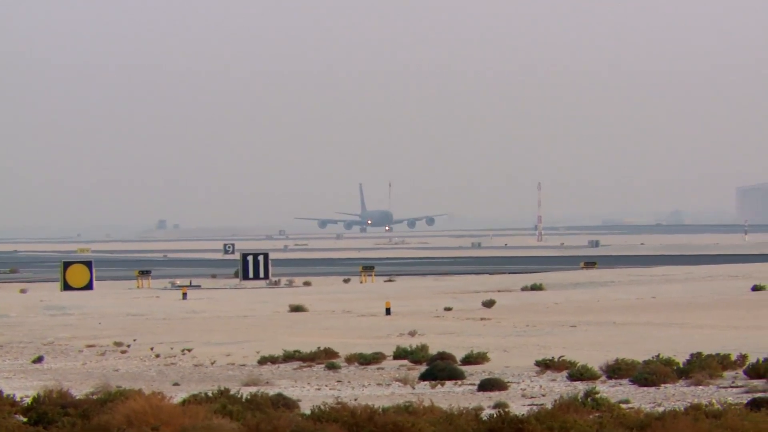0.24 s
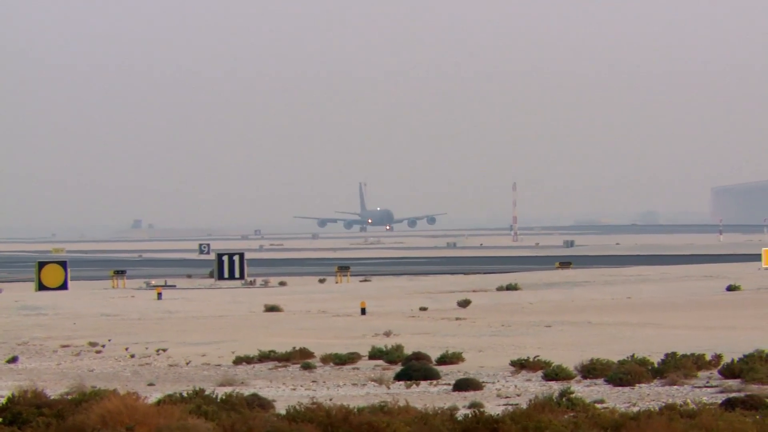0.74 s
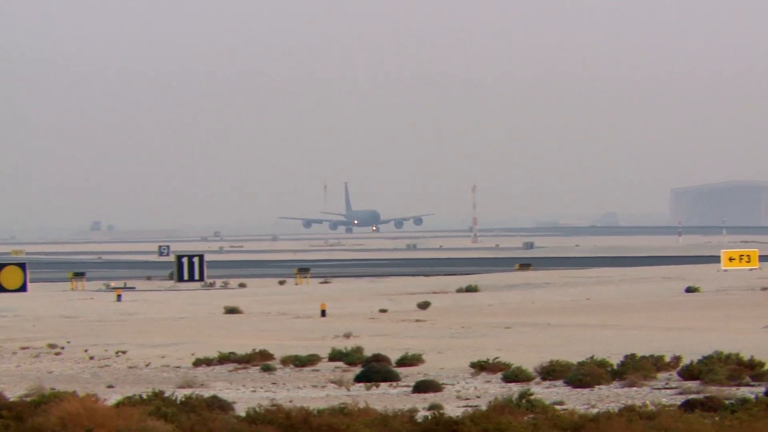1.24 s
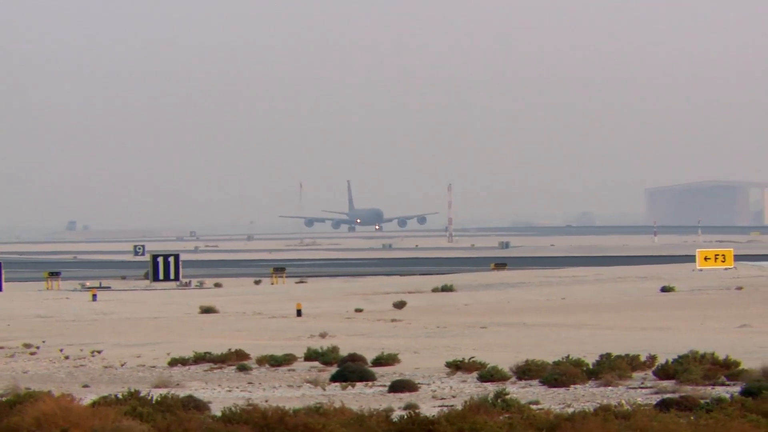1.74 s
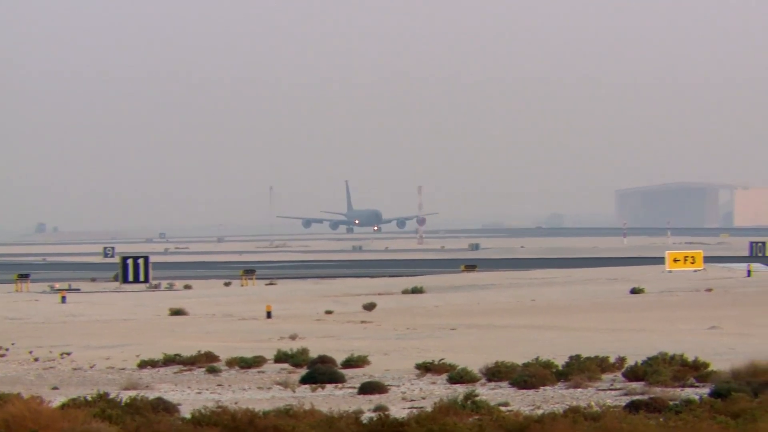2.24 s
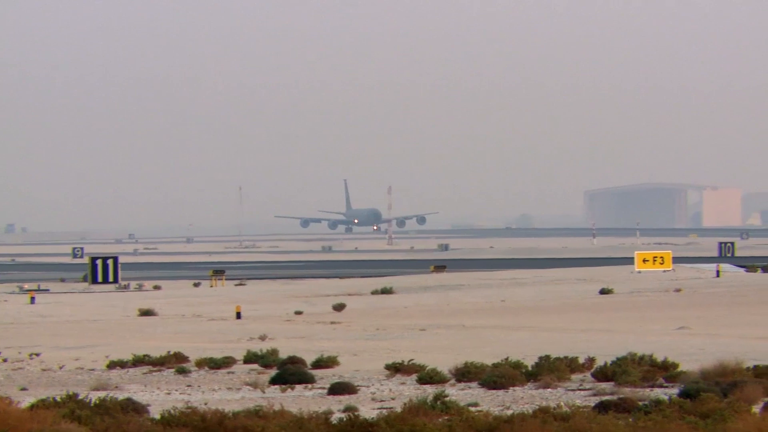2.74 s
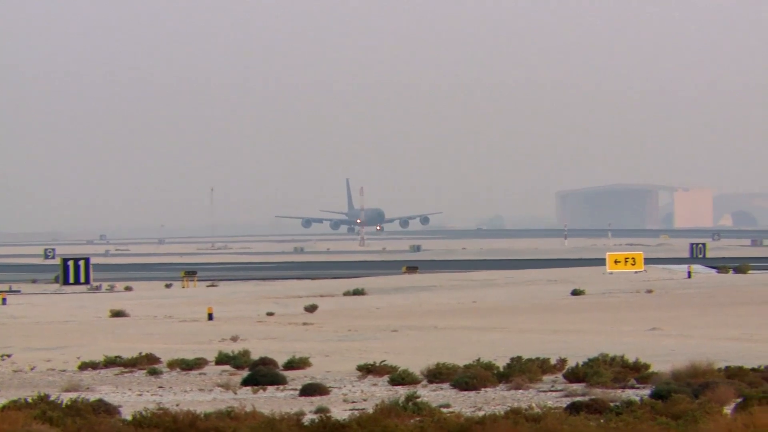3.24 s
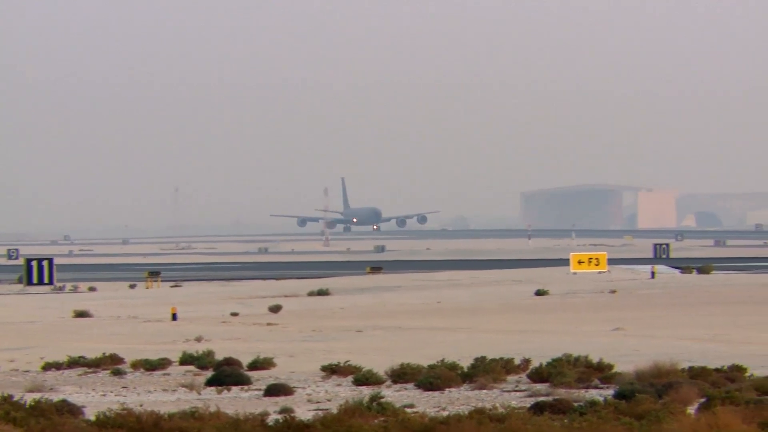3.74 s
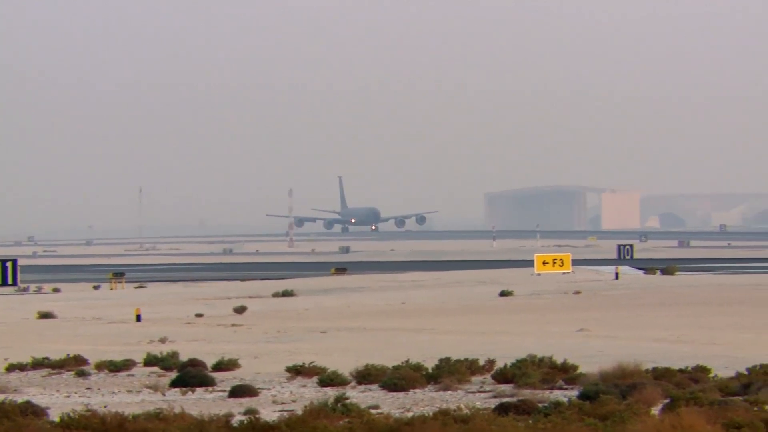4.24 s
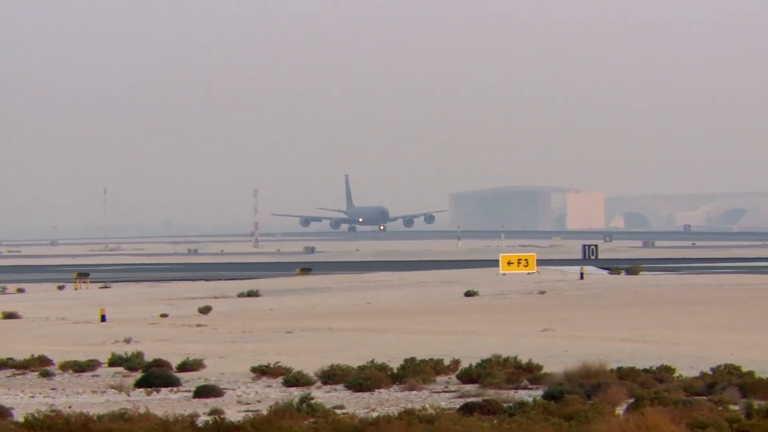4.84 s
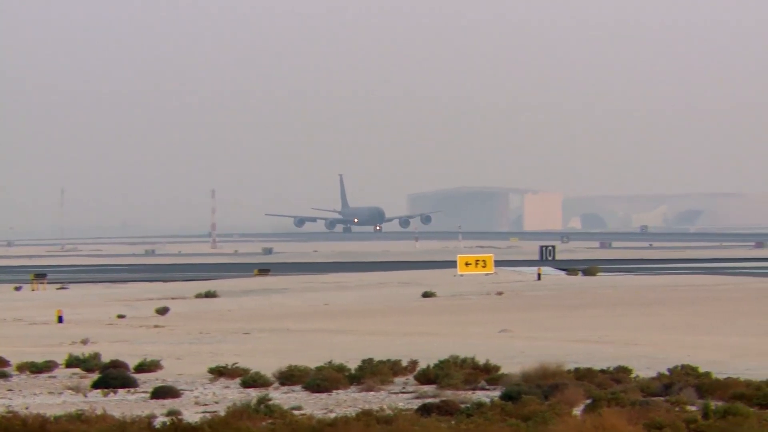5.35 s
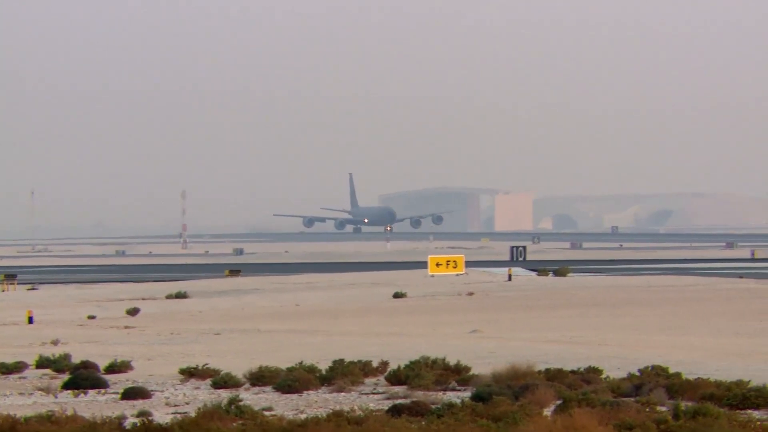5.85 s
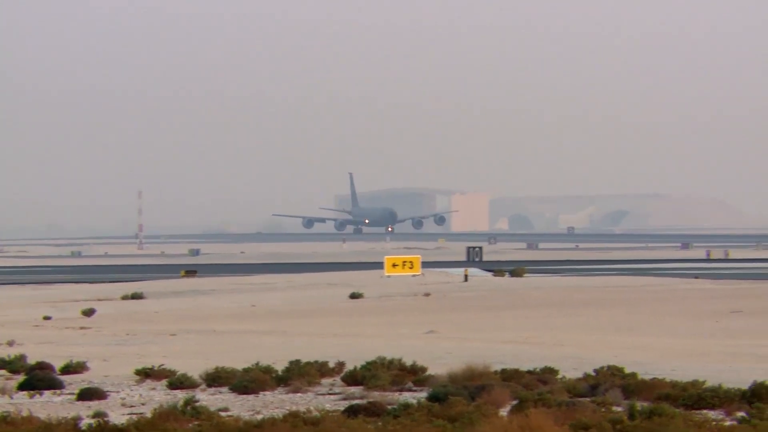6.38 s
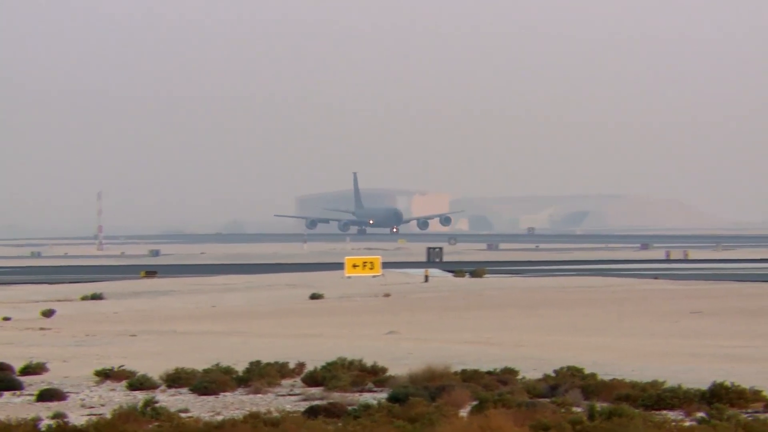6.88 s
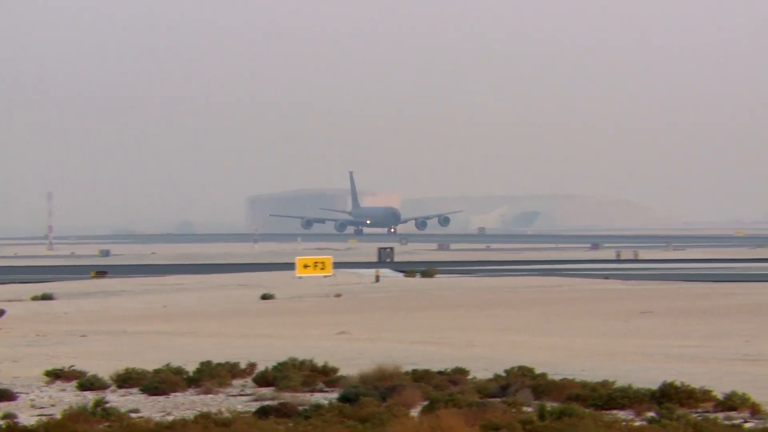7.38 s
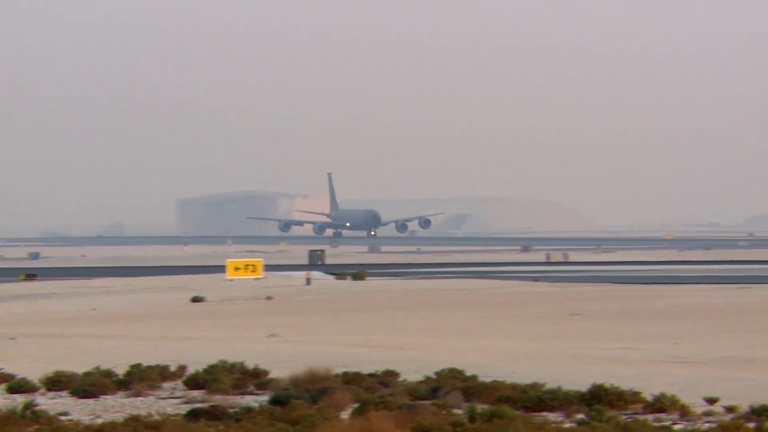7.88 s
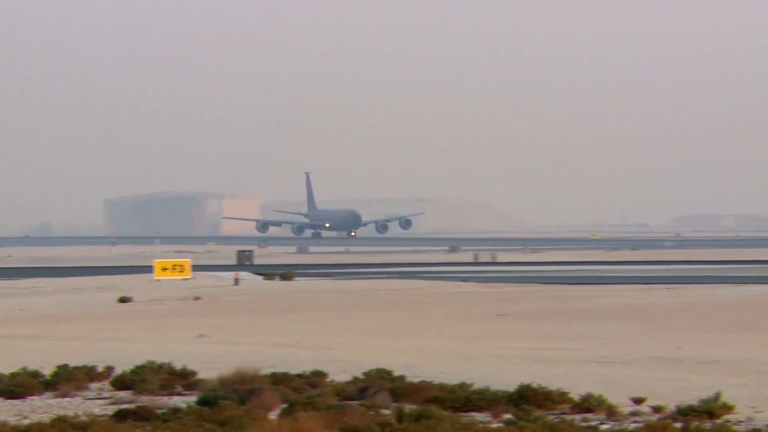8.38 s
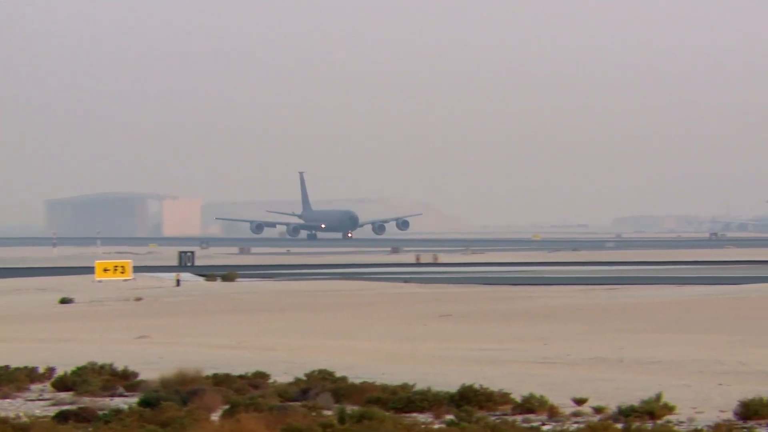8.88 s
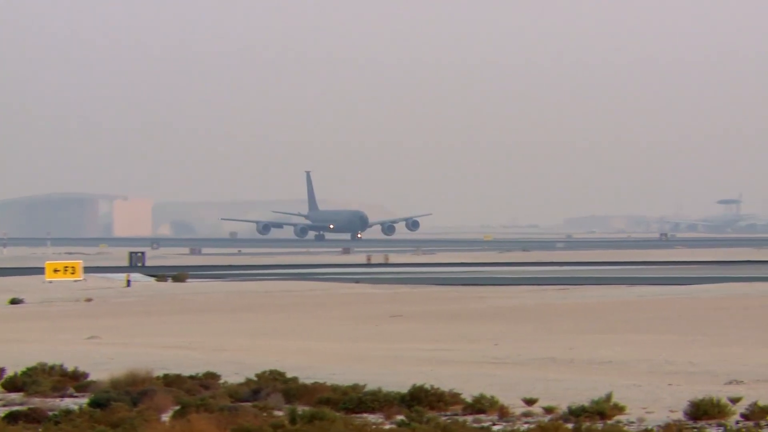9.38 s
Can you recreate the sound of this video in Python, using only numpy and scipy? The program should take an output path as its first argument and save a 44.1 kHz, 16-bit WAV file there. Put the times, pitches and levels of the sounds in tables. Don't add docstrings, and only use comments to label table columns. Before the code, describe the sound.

On a flat open airfield, a steady low drone sits under the deep rumble of a far four-engine jet. Its hiss and thin whine dip briefly, then grow over nearly ten seconds, becoming brighter and rougher. The camera's own microphone adds faint hiss, tiny early clicks, one hard plastic snap before the middle and small late ticks.

```python
import sys
import numpy as np
from scipy import signal
from scipy.fft import rfft, irfft, next_fast_len
from scipy.io import wavfile
from scipy.ndimage import uniform_filter1d, map_coordinates

SR = 44100
rng = np.random.default_rng(int(sys.argv[2]) if len(sys.argv) > 2 else 0)


def int16_out(signal):
    q = np.round(np.clip(np.atleast_2d(signal).T, -1, 1) * 32767)
    wavfile.write(sys.argv[1], SR, q.astype(np.int16))


def gain_from_db(level_db):
    decades = np.asarray(level_db, float) / 20
    return 10 ** decades


N = 424241
BLADES = 44


def unit(x):
    return x / np.sqrt(np.mean(x ** 2) + 1e-20)


def curves(rows):
    s, *cols = np.transpose(rows)
    return [np.interp(np.arange(N) / SR, s, c) for c in cols]


def swells(rows):
    t = np.arange(0, N + 64, 64) / SR
    gain_db = sum(db * np.exp(-((t - s) / half) ** 2) for s, db, half in rows)
    return curves(np.transpose([t, gain_db]))[0]


def wobble(rate):
    knots = rng.standard_normal(int(N * rate / SR) + 4)
    return map_coordinates(knots, [np.arange(N) * rate / SR])


def rush(spectrum, patchy_db):
    z = signal.stft(rng.standard_normal(N + 1024), nperseg=1024)[2]
    field = uniform_filter1d(rng.standard_normal(z.shape), size=10, axis=0)
    field = uniform_filter1d(field, size=9, axis=1)
    white = signal.istft(z * gain_from_db(patchy_db * unit(field)), nperseg=1024)[1]
    m = next_fast_len(N + 8192)
    f, db = np.transpose(spectrum)
    gain = gain_from_db(np.interp(np.log(np.fft.rfftfreq(m, 1 / SR) + 1), np.log(f + 1), db))
    return unit(irfft(rfft(white, m) * gain, m)[:N])


# pitch_hz, level_db (per Hz)
DRONE = [(120, -120), (170, -7.5), (205, 0), (240, -11.5), (400, -20.5), (650, -20), (930, -21),
         (1100, -30), (2200, -41), (3500, -63), (7000, -120)]


def airfield():
    return gain_from_db(-44.5 + 0.44 * wobble(0.87)) * rush(DRONE, patchy_db=0.1)


# start_s, level_db
APPROACH = [(0, -65), (1.6, -71), (2.5, -68.5), (3.4, -65.5), (4.6, -63), (5.8, -62.5), (6.8, -60.5),
            (7.5, -59), (8.2, -55.5), (8.9, -53.5), (9.25, -53), (9.62, -54)]


def approach():
    hiss_db = curves(APPROACH)[0]
    close_db = -53
    return hiss_db, hiss_db - close_db


# pitch_hz, level_db (per Hz)
RUMBLE = [(12, -52), (20, 5), (26, -11), (34, -16.5), (55, 0), (100, -2), (160, -7), (230, -19),
          (350, -30.5), (600, -120)]
# pitch_hz, level_db (per Hz)
ROAR = [(90, -120), (150, -5), (200, 1), (300, 2.5), (450, -4.5), (600, -11), (800, -24.5), (1200, -64),
        (2500, -120)]


def exhaust():
    nearer_db = approach()[1]
    rumble_db = -29 + 0.31 * nearer_db
    roar_db = -32.5 + 1.81 * nearer_db
    creeping_db = -47.5
    roar = np.hypot(gain_from_db(roar_db), gain_from_db(creeping_db))
    return gain_from_db(rumble_db) * rush(RUMBLE, patchy_db=0.0) + roar * rush(ROAR, patchy_db=1.4)


TRIM = [-.0024, -.0008, .0006, .002]


def shaft_angles():
    start_hz, rise_hz_per_s = 3930, 28.3
    blade_hz = start_hz + rise_hz_per_s * np.arange(N) / SR
    turns = 2 * np.pi * np.cumsum(blade_hz) / (SR * BLADES)
    return [turns * (1 + trim) + 0.016 * wobble(14) for trim in TRIM]


ENGINE_DB = [-1, -6, 3, -3]
# start_s (centre), gain_db, half_length_s
GLINTS = [(.6, -5, .6), (2.3, 5, .1), (2.75, 5, .08), (5.1, 3, .1), (5.4, -2, .15), (5.8, 1, .12),
          (6.3, 6, .15), (7.17, -6, .05), (7.288, 9, 0.043), (7.7, -8, 0.23), (8.03, 7, 0.075),
          (8.3, -7, 0.35), (9.462, -9, 0.066)]


def blade_whine(shafts, nearer_db):
    whine = np.zeros(N)
    for shaft, facing_db in zip(shafts, ENGINE_DB):
        tone = np.sin(BLADES * shaft + rng.uniform(0, 2 * np.pi))
        whine += gain_from_db(facing_db + 1.6 * wobble(11)) * tone
    whine /= np.sqrt(np.abs(uniform_filter1d(whine ** 2, size=6000)) + 1e-9)
    whine_db = -74 + 1.36 * nearer_db + swells(GLINTS)
    return gain_from_db(whine_db + 7.5) * whine


# shaft_order (multiples of shaft speed), level_db (over the fan hiss)
BUZZ = [(7, -15), (11, -23), (17, -24), (20, -18), (23, -18), (26, -25), (34, -28), (43, -43)]
# shaft_order, gain_db
PROUD = [(14, 4), (16, 6), (19, 2), (22, 4), (28, 3), (34, 6), (40, 10)]


def shaft_buzz(shafts, gust_db, near):
    orders = np.arange(BUZZ[0][0], BLADES)
    buzz_db = np.interp(orders, *np.transpose(BUZZ))
    buzz_db = buzz_db + sum(db * (orders == k) for k, db in PROUD)
    air = gain_from_db(-.3 * (1 - near))
    out = np.zeros(N)
    for shaft, facing_db in zip(shafts, ENGINE_DB):
        start = rng.uniform(0, 2 * np.pi, len(orders))
        spread_db = rng.normal(0, 3, len(orders))
        spin = (air * np.exp(1j * shaft)).astype(np.complex64)
        buzz = np.zeros(N, np.complex64)
        for k in reversed(range(len(orders))):
            buzz = buzz * spin + np.complex64(gain_from_db(buzz_db[k] + spread_db[k]) * np.exp(1j * start[k]))
        buzz = (buzz * np.exp(7j * shaft)).real
        level = gain_from_db(gust_db + facing_db - 3.5 + 3.5 * wobble(4))
        out += level * buzz / air ** 13
    return out


# pitch_hz, level_db (per Hz)
FAN = [(500, -120), (1000, -2.5), (1500, -2.5), (1800, 0), (2150, -1), (2450, -1.5), (2800, -4),
       (3500, -11.5), (4300, -20), (5500, -42), (9000, -120)]
# pitch_hz, level_db (per Hz)
FAN_FAR = [(500, -120), (1000, -2.5), (1400, 0), (1900, -2), (2400, -10), (3000, -13.5), (3600, -16.5),
           (4500, -26), (9000, -120)]


def fan_hiss(gust_db, near):
    hiss = np.sqrt(1 - near) * rush(FAN_FAR, patchy_db=1.1) + np.sqrt(near) * rush(FAN, patchy_db=0.5)
    return gain_from_db(gust_db - 0.5 + 0.71 * wobble(7.3)) * hiss


# pitch_hz, level_db (per Hz)
INLET = [(1300, -120), (1750, -5), (2000, -2), (2200, 4), (2500, -9), (3200, -120)]


def inlet_resonance(hiss_db, gain_db, near):
    return gain_from_db(hiss_db - 7 + 3 * gain_db) * near * rush(INLET, patchy_db=0.5)


# start_s (centre), gain_db, half_length_s
SURGES = [
    (5.25, 2, .15),
    (8.13, 2.5, .14),
    (8.38, -2.5, .08),
    (8.62, 2.5, .11),
    (8.95, 2, .13),
    (9.4, -2.5, .2),
]


def fans():
    hiss_db, nearer_db = approach()
    gain_db = swells(SURGES)
    gust_db = hiss_db + 0.14 * gain_db
    near = np.clip((hiss_db + 67) / 13, 0, 1)
    shafts = shaft_angles()
    tones = blade_whine(shafts, nearer_db) + shaft_buzz(shafts, gust_db, near)
    return tones + inlet_resonance(hiss_db, gain_db, near) + fan_hiss(gust_db, near)


def ring(modes, t, scatter_db):
    out = np.zeros(len(t))
    for (hz, db, t60), d in zip(modes, scatter_db):
        out += gain_from_db(db + d - 60 * t / t60) * np.sin(2 * np.pi * hz * t)
    return out


# start_s, level_db (peak), knock_db, catch_ring_db, pitch_hz (snap centre)
CLICKS = [(.287, -57, -12, -2, 8000), (.290, -63, -12, 2, 4100), (.381, -60, -12, -6, 3700),
          (3.59, -49.5, -4, 6, 3720), (3.592, -55, -7, 6.5, 9400), (3.595, -50, 8, -13, 6500),
          (3.593, -46, -6, 7, 2700), (3.599, -43, 2, 3.5, 2800), (3.603, -47, -7, -8, 2400),
          (3.632, -43.5, -5, -20, 6500), (7.467, -54.5, -18, -14, 10500), (7.570, -59, -18, 4, 5060)]
# pitch_hz, level_db, ring_s (to fall 60 dB)
SHELL = [(650, 3, 0.03), (960, 1, 0.021), (1170, 0, 0.027), (1320, 4, 0.031), (1520, -1, 0.024)]
# pitch_hz, level_db, ring_s (to fall 60 dB)
CATCH = [(2700, 0, .014), (4080, 0, .018), (5060, 0, .014), (6400, -2, .012), (8500, -2, .018),
         (10300, -2, .018)]


def camera():
    out, t = np.zeros(N + SR), np.arange(SR // 10) / SR
    f = np.fft.rfftfreq(len(t), 1 / SR) + 1
    snap_t60_s, rise_s = 0.011, 0.00019
    for s, db, knock_db, catch_db, hz in CLICKS:
        scatter_db = rng.normal(0, 3.7, (2, 8))
        snap_shape = gain_from_db(-5 * np.log2(f / hz) ** 2 - 27 * (f / 15000) ** 14)
        snap = unit(irfft(rfft(rng.standard_normal(len(t))) * snap_shape, len(t)))
        reach_db = -45 * np.log2(np.transpose(CATCH)[0] / hz) ** 2
        hit = gain_from_db(knock_db) * ring(SHELL, t, scatter_db[0])
        hit += gain_from_db(catch_db) * ring(CATCH, t, scatter_db[1, :len(CATCH)] + reach_db)
        hit += 0.8 * gain_from_db(-60 * t / snap_t60_s) * snap
        out[round(s * SR):][:len(t)] += gain_from_db(db) * hit * (1 - np.exp(-t / rise_s))
    return out[:N]


def scene():
    return (airfield() + exhaust() + fans() + camera())[None]


# pitch_hz, level_db (per Hz)
HISS = [(800, -120), (2000, 5), (5000, 1), (9000, -0.5), (15000, -1.5), (17000, -6.5)]


def preamplifier():
    return gain_from_db(-71) * rush(HISS, patchy_db=0.25)


def band_limit(x):
    return signal.sosfilt(signal.butter(12, 15820, fs=SR, output="sos"), x)


def record(dry):
    top_hz = 15050
    noisy = dry + preamplifier()
    m = next_fast_len(N + 8192)
    passed = np.fft.rfftfreq(m, 1 / SR) < top_hz
    mix = irfft(rfft(noisy, m) * passed, m)[:, :N]
    return band_limit(mix)


dry = scene()
out = record(dry)
int16_out(out)
```